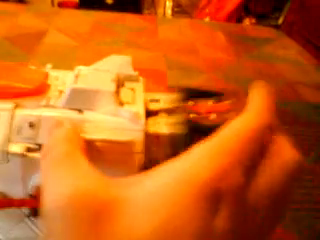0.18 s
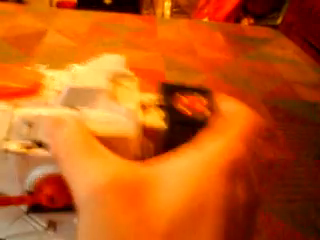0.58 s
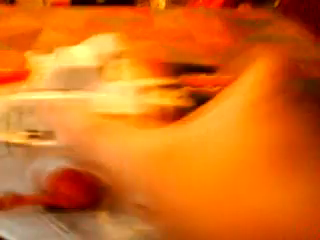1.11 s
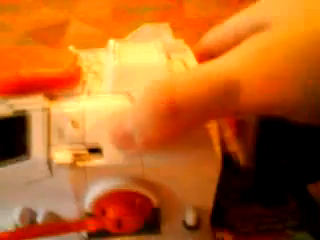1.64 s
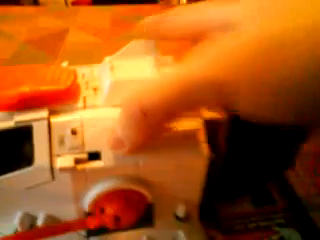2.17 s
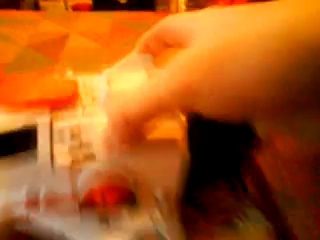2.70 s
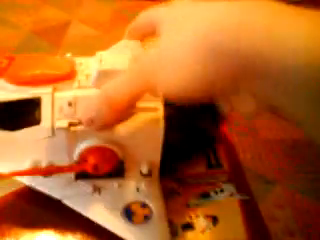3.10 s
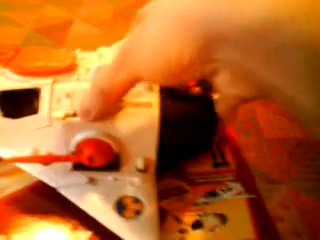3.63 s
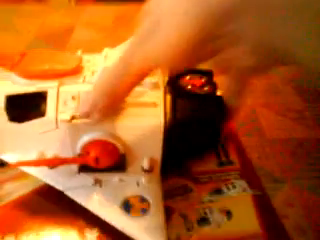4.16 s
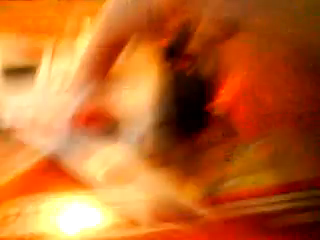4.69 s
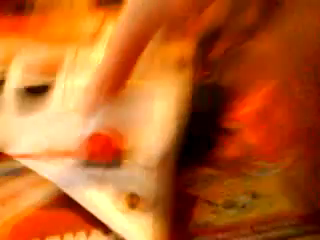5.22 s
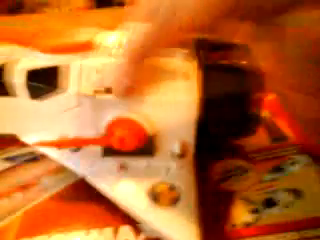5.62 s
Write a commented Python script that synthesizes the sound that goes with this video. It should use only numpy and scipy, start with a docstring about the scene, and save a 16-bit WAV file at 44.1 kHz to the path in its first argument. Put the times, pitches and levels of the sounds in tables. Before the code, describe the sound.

A hand works a hollow hard-plastic toy on a table, very close to a small microphone in a quiet room. A rapid rattle of knocks opens, then faint ticks; gritty scraping pulls follow, with a loud clatter before the middle, more scraping, and hard single knocks near the end. Low table thumps sit under the hits. Dry, mono, slightly muffled, with faint hiss and hum.

```python
"""A hand drags a hollow hard-plastic toy to and fro over a table, close to a small microphone indoors.
Over quiet hiss and hum, a short pull opens, then a burst of knocks and rattles up to 0.3 s, then faint ticks.
Longer pulls from 1.1, 2.8, 3.6 and 4.9 s send dense tiny slips into the shell; a loud clatter comes near 2.4 s,
hard knocks near 4.5 and 5.3 s, and a last pull from 5.7 s. Struck, the shell rings as a sum of dying modes;
the table top thumps underneath in modes of its own."""
import sys
import numpy as np
from scipy import signal
from scipy.fft import rfft, irfft
from scipy.io import wavfile
from scipy.ndimage import uniform_filter1d

SR = 44100
rng = np.random.default_rng(int(sys.argv[2]) if len(sys.argv) > 2 else 0)


def voltage_ratio(level):
    """Linear amplitude factor for a level in decibels (scalar or array-like)."""
    return 10 ** (np.asarray(level, float) / 20)


def file_out(sig):
    """Save sig as 16-bit WAV at sys.argv[1]."""
    # one column per channel
    cols = np.atleast_2d(sig).T
    # limit, then scale
    lim = np.clip(cols, -1, 1)
    pcm = np.round(lim * 32767).astype(np.int16)
    wavfile.write(sys.argv[1], SR, pcm)


N = 255134  # samples, about 5.8 s

# Knocks of loose parts. Each row: time of the peak in seconds (roughly), level of the shell in dB, pitch in Hz
# near which the shell rings most, level of the thin parts against the shell in dB, time to fade 60 dB in
# seconds (limited when played).
KNOCKS = [(0.0137, -12.5, 1390, -31, 0.017), (0.1106, -12.5, 1140, -23, 0.031),
          (.123, -17.5, 1440, -25, .02), (0.1374, -6, 2150, -30, 0.027), (0.1602, -9.5, 1510, 0, .019),
          (0.1722, -17, 1500, 0, .015), (.194, -13, 2000, -2, 0.017), (.2105, -11, 1700, -10, 0.022),
          (0.2191, -12, 1800, -1, .015), (0.233, -8, 1900, -10, .02), (0.243, -13, 1600, -6, 0.018),
          (.254, -10, 1900, -9, 0.022), (.2705, -15.5, 1700, -4, .015), (.167, -11, 1450, -18, 0.039),
          (0.1789, -10.5, 1340, 0.5, 0.025), (0.185, -9, 1740, -20, 0.022),
          (0.2038, -7.5, 1430, -10, 0.049), (0.2267, -9, 1450, -10, 0.025), (0.2494, -13, 1920, -31, .045),
          (0.2728, -12.5, 1680, -16.5, .029), (.286, -4.5, 1680, -9.5, 0.024), (.291, -13, 1900, -9, .015),
          (0.2967, -19, 1500, -14, .02), (0.3798, -16, 1720, -37, .045), (.406, -24.5, 2000, -4, 0.047),
          (0.4212, -24, 1990, -12, .032), (0.4527, -26.5, 1770, -4, .045), (.479, -36, 1200, -30, .012),
          (0.488, -33, 1520, -25, .045), (.526, -14.5, 1450, -21, 0.02), (.535, -28, 1300, -29, .02),
          (0.586, -26.5, 1900, -30, 0.015), (0.6148, -30.5, 1350, -13, 0.013),
          (0.67, -30.5, 1120, -30, 0.032), (0.6968, -33, 1250, -30, .024), (0.7745, -32, 1290, -19, .026),
          (.797, -26, 1030, -18, .016), (.822, -26.5, 900, -24, .015), (0.8272, -20, 2030, -9.5, 0.038),
          (.884, -28, 2200, -11, 0.016), (0.896, -5.5, 1520, -13, 0.029), (0.9, -16, 1210, -21, 0.032),
          (0.9257, -15.5, 1490, -19.5, 0.018), (0.984, -29, 1380, -18, .012), (1.017, -29, 1760, -1, 0.027),
          (1.061, -18, 1440, -9, 0.038), (1.066, -17.5, 1690, -10.5, .029),
          (1.0877, -19.5, 1570, -7.5, .027), (1.098, -26, 1480, -30, 0.021), (1.117, -17, 1450, -30, 0.04),
          (1.137, -16.5, 1500, -7, 0.031), (1.159, -5.5, 1850, -22, 0.055), (1.1712, -14, 1790, -17, .035),
          (1.182, -16, 2060, -16, .034), (1.343, -14.5, 1450, -16, 0.025), (1.3652, -12, 1500, -18.5, .02),
          (1.3732, -15.5, 1490, -12, .019), (1.3848, -14.5, 1580, -15, .012), (1.734, -13, 1800, -13, .02),
          (1.7465, -6, 1370, -10, 0.053), (1.765, -19, 1840, -27, .016), (1.7756, -17, 1780, -24, 0.018),
          (1.847, -27, 1810, -30, .037), (1.906, -20.5, 1770, -20, 0.026),
          (1.9263, -13.5, 1580, -30, 0.032), (1.951, -14.5, 1250, -29, 0.0056),
          (1.995, -18, 885, -26, 0.0081), (2.0063, -23, 1870, -1.5, 0.023), (2.043, -13, 1370, -28, 0.013),
          (2.076, -10.5, 1690, -21, 0.031), (2.1986, -13, 1400, -30.5, 0.043),
          (2.213, -5.5, 1350, -7.5, 0.017), (2.2627, -19, 1460, -24, 0.041),
          (2.319, -23, 900, -29.5, 0.022), (2.372, -14.5, 1880, -4, 0.046), (2.3803, -5, 1460, -23, 0.03),
          (2.3843, -13, 900, -11.5, .02), (2.391, -9.5, 1700, -6, .02), (2.395, -6, 1900, -5.5, 0.022),
          (2.3995, -8.5, 1650, -4.5, 0.039), (2.409, -16, 1500, -25, .017), (2.4194, -9, 2100, -20, .02),
          (2.4227, -7, 1700, -18, 0.05), (2.4278, -12, 1700, -7, .02), (2.437, -15.5, 1500, -14, .015),
          (2.449, -11.5, 1830, -12, 0.042), (2.461, -22, 1200, -7, .02), (2.4824, -21.5, 1370, -27, .016),
          (2.508, -32, 1700, -25, .012), (2.542, -27, 1450, -32, 0.044), (2.633, -30, 1780, -29, .012),
          (2.7186, -15.5, 1800, -11, 0.03), (2.748, -18.5, 1320, -9, 0.026),
          (2.7572, -15.5, 1630, -25.5, 0.039), (2.7725, -13, 1580, -7.5, .018),
          (2.866, -22.5, 1900, -18, .027), (2.914, -24.5, 600, -20, .026),
          (3.045, -17.5, 1820, -29.5, 0.052), (3.226, -15, 1680, -7, 0.029), (3.232, -17, 1640, -4, 0.0085),
          (3.24, -7, 1700, -20, 0.022), (3.26, -18, 900, -13, .014), (3.2758, -21.5, 1900, 2.5, .012),
          (3.289, -19.5, 1860, 1, 0.028), (3.516, -35, 1350, -13, .014), (3.5277, -25.5, 1610, -28, .014),
          (3.5625, -32, 1590, -28, .018), (3.624, -14, 1840, -12, 0.041), (3.6919, -10, 1680, -17, 0.015),
          (3.7018, -5, 1770, -26, 0.038), (3.7134, -19.5, 1600, -16, 0.029), (3.882, -25, 900, -25, 0.014),
          (4.481, -17.5, 1010, -22, .011), (4.488, -13.5, 1240, -16, 0.025),
          (4.5013, -2.5, 950, -7.5, 0.0091), (4.507, -14.5, 1510, -11, .015),
          (4.5134, -7.5, 1700, -9, 0.013), (4.531, -15, 1900, -23, .015), (4.5403, -15.5, 1800, -27, 0.04),
          (4.622, -35.5, 1800, 0, .015), (4.652, -32.5, 1600, 1, 0.029), (4.7015, -32, 1590, -18, 0.04),
          (4.755, -33, 2000, -5, 0.018), (4.8195, -20.5, 1620, -21, 0.026), (4.867, -17.5, 1260, -14, 0.03),
          (4.8857, -14, 1630, -24, 0.0099), (4.894, -10.5, 1520, -6.5, 0.051),
          (4.9043, -13, 1490, -22, .028), (5.1615, -15.5, 1800, -25, 0.019), (5.242, -10, 1760, -20, 0.052),
          (5.254, -21, 1200, -16, .02), (5.2653, -14, 1540, -17, .019), (5.271, -24, 1500, -19, .015),
          (5.274, -2.5, 1580, -5, 0.037), (5.292, -25, 1510, -30, .029), (5.4826, -22, 1330, -13, 0.018),
          (5.599, -31, 1820, -33, 0.026), (5.654, -15, 1990, -29, .026), (5.6727, -18.5, 1640, 0.5, 0.05),
          (5.6798, -13, 1550, -17, 0.024)]
# Ways the shell can ring; the first three are its deep body. Each row: pitch in Hz, level in dB,
# fade time as a factor.
SHELL_MODES = [(550, -16.5, 0.69), (836, -4.5, 1.1), (1010, -4, 1.3), (1258, -4.5, 1.6), (1430, -1, 0.97),
               (1660, 3.5, 0.89), (1836, 6, 0.73), (2023, 5, 0.78), (2200, 6, 0.2), (2575, -0.5, 0.12),
               (3004, 0, 0.74), (3330, -7, 0.46)]
# Ways the thin parts can ring. Each row: pitch in Hz, level in dB, fade time as a factor.
EDGE_MODES = [(3850, 3.5, 0.85), (4400, -6, 0.7), (4760, 8.5, 0.9), (5250, 3, 0.84), (5555, 12, 0.54),
              (5766, 6, 0.49), (6040, 3.5, 0.52)]
# Ways the table top can ring. Each row: pitch in Hz, level in dB, 60 dB fade time in seconds (shortened later).
TABLE_MODES = [(75, -8, 0.1), (121, -7.5, 0.089), (203.6, 2.5, 0.097), (253.2, 5.5, 0.094),
               (295.2, 10.5, 0.093), (464, 3, 0.045)]
# Tone colour of scraping on the shell. Each row: frequency in Hz, relative level in dB per Hz.
SCRAPE_COLOUR = [(700, -25.5), (1150, 2), (1900, -1.5), (2450, -4), (3000, -8.5), (3400, -25.5),
                 (4500, -30.5)]
# Tone colour of the thin parts' hiss. Each row: frequency in Hz, relative level in dB per Hz.
HISS_COLOUR = [(1880, -37), (3200, -1), (3390, -21), (4260, -0.5), (4710, -5), (5680, 3.5), (6690, -12),
               (7100, -49), (9230, -49.5), (15600, -120)]
# Tone colour of the shaken table. Each row: frequency in Hz, relative level in dB per Hz.
RUMBLE_COLOUR = [(12, -45), (20, -15), (59, -1), (92, -8), (124, -4), (179, -9.5), (206, -6), (299, -2.5),
                 (414, -14), (600, -19), (780, -34.5), (1320, -120)]
# Tone colour of the room's hiss. Each row: frequency in Hz, relative level in dB per Hz.
ROOM_COLOUR = [(12, -36.5), (20, -19), (112, 12), (206, 4), (291, -3), (411, -22.5), (688, -4), (924, 15.5),
               (1750, 11.5), (3480, -9), (5420, -14), (6600, -18), (7100, -39.5), (9230, -61.5),
               (15600, -120)]
# Narrow bands that stand out and glide while sliding. Each row: start in seconds, end in seconds (a row that
# ends before it starts is silent), first pitch in Hz, last pitch in Hz, average level in dB.
SINGING = [(1.14, 1.32, 5820, 5730, -35.5), (1.13, 1.36, 2350, 2300, -38), (1.38, 1.74, 2290, 2370, -35.5),
           (1.2, 1.61, 1410, 1110, -41), (1.44, 1.3, 4800, 4600, -38), (1.53, 1.75, 4430, 4370, -35),
           (2.792, 3.13, 1910, 2000, -39.5), (2.8, 3.16, 2470, 2520, -43), (3.76, 3.99, 1900, 1740, -33),
           (3.74, 3.98, 1490, 1520, -35.5), (3.76, 3.4, 2820, 2500, -40), (3.98, 4.2, 2540, 2680, -38.5),
           (4.08, 4.3, 2380, 2380, -32), (4.4, 4.16, 1300, 1044, -52), (3.96, 4.3, 5680, 5580, -40.5),
           (4.08, 4.32, 5250, 5420, -36), (3.97, 4.1, 3440, 4500, -42), (4.1, 4.41, 4060, 4270, -38.5),
           (4.26, 4.453, 1940, 1960, -37.5), (4.92, 5.083, 1620, 2260, -37),
           (5.027, 5.21, 1710, 1800, -33.5), (4.974, 5.13, 4860, 5130, -37), (1.48, 1.4, 2200, 2000, -33)]
# Steady pulls over the table. Each row: start in seconds, end in seconds, scrape at the start in dB,
# scrape at the end in dB, share of the thin edge in dB.
DRAGS = [(0, 0.132, -35.5, -30, -5), (0.159, 0.297, -19.5, -22, -11), (1.065, 1.1, -39, -52, -5),
         (1.144, 1.354, -32.5, -28.5, 1.5), (1.35, 1.796, -26, -26.5, -2), (1.916, 1.98, -37, -41, -0.5),
         (2.086, 2.188, -37.5, -32.5, -3.5), (2.756, 3.175, -31.5, -31.5, -2), (3.374, 3.494, -35, -57, -2),
         (3.605, 3.954, -29.5, -33, -4.5), (3.955, 4.432, -26, -28.5, -2.5), (4.798, 4.827, -45.5, -51, 0),
         (4.877, 5.207, -29.5, -29, -2), (5.667, 5.798, -30.5, -25, -5)]
# Jolts and shifts of the hand. Each row: time of the peak in seconds, scrape in dB, seconds to swell 20 dB,
# seconds to fade 20 dB (both at least 0.002 when played), share of the deep body in dB.
JOLTS = [(0.021, -37.5, -1, 0.1, 5.5), (0.221, -24.5, 0.2, 0.02, -2), (0.291, -25.5, 0.2, 0.11, -7.5),
         (.408, -30.5, -0.15, 0.12, -10), (.424, -36.5, 0.1, 0.12, -14.5), (0.45, -49, 0.5, 0.18, -11),
         (.678, -48, 0, 0, -3), (.869, -40, 0.1, 0.4, 1), (0.903, -33, 0.07, -0.16, -3),
         (.96, -45.5, 0.8, 0.5, -8), (1.165, -20, 0.09, 0.09, -13.5), (1.378, -27.5, 0, 0.25, -7.5),
         (1.746, -20, 0.16, 0.06, -15), (1.921, -35.5, 0.3, 0.43, -8), (2.085, -34.5, 0.2, 0.15, -11),
         (2.219, -18.5, 0.0962, 0.04, -19), (2.251, -30.5, 0.21, 0, 5.5), (2.357, -41, 0.4, 0, -4.5),
         (2.372, -16.5, -0.03, 0.0429, -8), (2.395, -13, -0.0266, 0.0578, -6.5),
         (2.424, -20, -0.03, 0.07, -6.5), (2.485, -28.5, 0.2, -0.04, -1.5), (2.56, -50, 2.5, 2.5, -3),
         (2.585, -41, .05, .06, -8), (2.765, -28.5, 0.08, 0.24, -11.5), (3.04, -37.5, -0.3, 0.9, -11.5),
         (3.24, -19, 0.04, 0.04, -4), (3.268, -26, 0.02, 0.06, -4), (3.383, -33.5, 0.2, 0.08, -4.5),
         (3.645, -25, 0.05, 0.36, -9), (4.44, -35.5, -0.7, 0.32, -4), (4.503, -19.5, 0, 0.0846, -9),
         (4.649, -52, 0.5, 0.3, -4), (4.809, -38, -0.13, 0.1, -3), (4.884, -30.5, 0, 0.4, -7.5),
         (5.272, -18.5, 0.03, 0.0558, -2), (5.33, -39.5, -0.4, 0.4, -14), (5.5, -51, 3, -0.5, 2.5),
         (5.638, -42.5, 0.14, -1.5, 0.5), (5.669, -26.5, 0.05, 0.2, -10)]
# The hand leans the toy onto the table, which rumbles. Each row: time of the peak in seconds, level in dB,
# seconds to swell 20 dB, seconds to fade 20 dB (both at least 0.002 when played).
LEANS = [(.05, -44.5, 0.5, 0.3), (.17, -37, 0, 0.29), (.291, -30.5, 0.15, 0.03), (.532, -51, 0, 0.2),
         (.66, -46.5, .1, 0.1), (0.868, -37.5, 0.04, 0.2), (1.06, -39.5, 0.1, 0.36),
         (1.164, -34.5, 0.04, 0), (1.378, -37, 0.07, 0.26), (1.746, -36, 0.15, 0.18), (1.921, -44.5, 0, 1),
         (2.218, -28.5, 0.04, 0.09), (2.404, -26, -0.02, 0.1), (2.765, -36, 0.06, -0.04),
         (3.041, -50, 0.3, -0.5), (3.206, -37, -0.23, 0.34), (3.282, -31, -0.04, 0), (3.383, -43, 0.3, 0),
         (3.567, -46.5, -0.5, 0.3), (3.643, -32, 0, 0.1), (4.464, -38, 0.12, 0.26), (4.81, -47.5, 0.3, 1.2),
         (4.877, -29.5, 0.01, 0.12), (5.1, -51.5, -2.5, 3.5), (5.26, -45, 0.3, 0.15), (5.669, -43, 0.14, 0)]
# Dull blows of the toy's base on the table top. Each row: start in seconds, peak in dB before the soft start,
# extra weight of the deepest modes in dB.
THUMPS = [(.166, -21, -6), (.203, -16.5, -5), (.2255, -14.5, -9), (.237, -16.5, -8), (.285, -11, -7),
          (.312, -22, -7.5), (.525, -29.5, -3), (.548, -34, -8), (.669, -36, -2), (.895, -31, 1),
          (1.016, -30.5, 1), (1.064, -30, 11), (1.171, -19.5, 10), (1.3435, -12, -1), (1.745, -16.5, 16),
          (1.764, -20, 29), (1.906, -24, 1.5), (2.075, -29.5, -3), (2.212, -13.5, 13), (2.379, -11.5, 0.5),
          (2.398, -11.5, -1), (2.421, -12, -4.5), (2.482, -21.5, -9), (2.541, -33, -2), (2.771, -26, 2),
          (2.792, -27, -5), (2.912, -17.5, 1), (3.044, -27, -7), (3.198, -22.5, -6), (3.226, -15, -4),
          (3.26, -19, 3), (3.377, -23.5, 4), (3.623, -22, 1), (3.702, -17.5, 1.5), (4.487, -21, -0.5),
          (4.5125, -21.5, 7), (4.88, -13, -6), (4.893, -25, -4), (5.265, -17, -6), (5.274, -16, -8),
          (5.291, -20, -1), (5.482, -34, 3), (5.677, -18.5, 9)]

ROOM_DB, HUM_DB, HUM_HZ = -53, -61, 120.4
GRIP_DB_PER_S, RELEASE_DB_PER_S = 999.5, 700.5  # how fast a pull starts and stops
DRAG_HZ, JOLT_HZ = 1900, 1580  # the shell sounds higher when pulled lightly, lower when gripped
DRAG_BODY_DB, DRAG_TABLE_DB = -26, -30.5  # what a pull passes to the deep body and the table
JOLT_EDGE_DB = -15.5  # what a jolt passes to the thin edge
REST_DB, REST_BODY_DB, REST_EDGE_DB, REST_TABLE_DB = -59.5, -61.5, -66, -57.5  # the hand at rest still rustles
FAINT_HZ, FAINT_WIDTH_HZ = 3340, 100  # a narrow band that is heard more faintly, by a varying amount
KNOCK_TABLE_DB = -21.5  # every knock leaks a little into the table
DEEP_HZ = 170
EDGE_HZ = 7080  # upper limit of the recorded band


def evened(x):
    """Scales to an average strength (rms) of 1."""
    return x / np.sqrt(np.mean(x ** 2) + 1e-20)


def coloured(x, points):
    """Filters a sound to a tone colour without pre-echo: minimum phase from the folded cepstrum."""
    f, db = np.transpose(points)
    hz = np.fft.rfftfreq(4096, 1 / SR)
    gain_db = np.maximum(np.interp(np.log(hz + 1), np.log(f + 1), db), -70)
    cepstrum = irfft(np.log(voltage_ratio(gain_db)))
    cepstrum[1:2048] *= 2  # fold the later half onto the earlier one
    cepstrum[2049:] = 0
    impulse = irfft(np.exp(rfft(cepstrum)))
    return evened(signal.oaconvolve(x, impulse)[:len(x)])


def room_tone():
    """Steady hiss of room and preamplifier with a faint mains hum."""
    hum = voltage_ratio(HUM_DB) * np.sin(2 * np.pi * HUM_HZ * np.arange(N) / SR)
    hiss = coloured(rng.standard_normal(N), ROOM_COLOUR)
    return voltage_ratio(ROOM_DB) * hiss + hum


def wander(seconds):
    """Slow random drift of rms 1: noise smoothed over the given time."""
    window = np.hanning(round(seconds * SR))
    return evened(signal.oaconvolve(rng.standard_normal(N), window, "same"))


def peaks(t, s, db, swell, fade):
    """Gain of events that swell and fade evenly in dB, one row each."""
    before = (s - t) / np.maximum(swell, .002)
    after = (t - s) / np.maximum(fade, .002)
    return voltage_ratio(db - 20 * np.maximum(before, after))


def hand():
    """Pulls, jolts, leaning and rest add in power to drive shell, body, edge and table (dB); held pitch (Hz)."""
    t = np.arange(0, N, 64) / SR
    start, end, from_db, to_db, edge_db = np.transpose(DRAGS)[:, :, None]
    along = np.clip((t - start) / (end - start), 0, 1)
    onset_db = GRIP_DB_PER_S * np.maximum(start - t, 0)
    release_db = RELEASE_DB_PER_S * np.maximum(t - end, 0)
    drag = voltage_ratio(from_db + (to_db - from_db) * along - onset_db - release_db)
    *shape, body_db = np.transpose(JOLTS)[:, :, None]
    jolt = peaks(t, *shape)
    lean = peaks(t, *np.transpose(LEANS)[:, :, None])
    # each row: share of the pulls in dB, gain of the other events, level at rest in dB
    parts = [(0, jolt, REST_DB),
             (DRAG_BODY_DB, jolt * voltage_ratio(body_db), REST_BODY_DB),
             (edge_db, jolt * voltage_ratio(JOLT_EDGE_DB), REST_EDGE_DB),
             (DRAG_TABLE_DB, lean, REST_TABLE_DB)]
    power = [((drag * voltage_ratio(db)) ** 2).sum(0) + (more ** 2).sum(0) + voltage_ratio(rest) ** 2 for db, more, rest in parts]
    pulled = (drag ** 2).sum(0) / power[0]
    held_hz = JOLT_HZ + (DRAG_HZ - JOLT_HZ) * pulled
    curves = (*(10 * np.log10(power)), held_hz)
    return [np.interp(np.arange(N) / SR, t, curve) for curve in curves]


def slips(per_s, spread_db, smooth):
    """Tiny stick-slip clicks of uneven size and sign, with smooth rubbing noise, all swelling in clumps."""
    clumps = voltage_ratio(1.15 * wander(0.008))
    size = voltage_ratio(spread_db * np.minimum(rng.exponential(1, N), 3)) * rng.choice([-1, 1], N)
    clicks = size * (rng.random(N) < per_s / SR)
    return clumps * (evened(clicks) + smooth * rng.standard_normal(N))


def near_db(hz, centre_hz, steep_db):
    """Modes near the pitch of the touched spot ring most; steep_db is lost one octave away."""
    return -steep_db * np.log2(hz / centre_hz) ** 2


def rubbed(x, modes, width_hz, centre_hz, steep_db, grip_db):
    """Slips drive each mode; the shifting grip damps now one mode, now another."""
    out = np.zeros(N)
    for hz, db, _ in modes:
        mode = evened(signal.lfilter(*signal.iirpeak(hz, hz / width_hz, SR), x))
        out += voltage_ratio(db + near_db(hz, centre_hz, steep_db) + grip_db * wander(0.14)) * mode
    return out / np.sqrt(uniform_filter1d(out ** 2, SR // 8) + 1e-12)  # steady over an eighth of a second


def singing(x, width_hz):
    """Gliding resonances: shift the band to zero, smooth twice, shift back."""
    out = np.zeros(N)
    r = np.exp(-np.pi * width_hz / SR)
    smoother = np.convolve([1, -r], [1, -r])
    waver, patchy = 1 + .015 * wander(0.055), voltage_ratio(2.5 * wander(0.017))  # the grip is never still
    for start, end, from_hz, to_hz, db in SINGING:
        part = slice(round(start * SR), round(end * SR))
        glide_hz = np.linspace(from_hz, to_hz, len(x[part])) * waver[part]
        turn = np.exp(2j * np.pi * np.cumsum(glide_hz) / SR)
        band = (turn * signal.lfilter([1], smoother, x[part] / turn)).real
        out[part] += voltage_ratio(db) * patchy[part] * evened(band) * signal.windows.tukey(len(band), .4)
    return out


def sliding():
    """Slips excite shell and thin edge, partly broad, partly in their modes; slower bumps shake the table."""
    scrape_db, body_db, hiss_db, rumble_db, held_hz = hand()
    # a light touch rustles in fits
    fitful_db = np.clip(0.36 * (-37.0 - scrape_db), 0, 3.5) * wander(0.025)
    rub = slips(per_s=2000, spread_db=3.0, smooth=0.83)
    fine = 0.052 * rub + slips(per_s=6500, spread_db=1.0, smooth=0.91)
    bumps = slips(per_s=420, spread_db=6.5, smooth=1.72)

    scrape = 0.32 * coloured(rub, SCRAPE_COLOUR)
    scrape += 0.55 * rubbed(rub, SHELL_MODES[3:], 220, held_hz, steep_db=22.0, grip_db=6.5)
    deep = rubbed(rub, SHELL_MODES[:3], 200, 850, steep_db=3, grip_db=3.0)
    deep = signal.sosfilt(signal.butter(2, [480, 1300], "bandpass", fs=SR, output="sos"), deep)
    hiss = .8 * coloured(fine, HISS_COLOUR)
    hiss += .45 * rubbed(fine, EDGE_MODES, 150, 5200, steep_db=0, grip_db=2.5)

    shell = voltage_ratio(scrape_db + fitful_db) * scrape
    shell += voltage_ratio(body_db + fitful_db) * deep
    shell += voltage_ratio(hiss_db + 0.83 * fitful_db) * hiss
    shell += singing(rub, width_hz=263)
    removed = np.clip(0.25 + 0.44 * wander(0.22), 0, 1)  # varying share taken out of the faint band
    faint_band = signal.lfilter(*signal.iirpeak(FAINT_HZ, FAINT_HZ / FAINT_WIDTH_HZ, SR), shell)
    shell -= removed * faint_band
    rumble = coloured(bumps, RUMBLE_COLOUR)
    return shell + voltage_ratio(rumble_db + 1.9 * wander(0.023)) * rumble


def ring(modes, t, t60, luck, weight_db=0):
    """Sum of dying modes, a little detuned, of random strength and sign, as grip and point of contact vary."""
    hz, db, long = np.transpose(modes)[:, :, None]
    strength, detune = luck[:2 * len(modes)].reshape(2, -1, 1)
    fading_db = db + weight_db + 2.5 * strength - 60 * t / (t60 * long)
    wave = np.sin(2 * np.pi * hz * (1 + 0.045 * detune) * t)
    sound = (voltage_ratio(fading_db) * np.sign(detune + 1) * wave).sum(0)
    return sound / abs(sound).max()


def knocks():
    """Each knock is one hard crack and milliseconds of grinding that ring shell and thin parts, drily."""
    out, t = np.zeros(N + SR), np.arange(6000) / SR
    luck = rng.standard_normal((len(KNOCKS), 48 + 300))  # 24 for the shell, 24 for the edge, 300 to grind
    shell_hz = np.array(SHELL_MODES)[:, :1]
    rise, grind = .0009, .0025  # s
    grinding = np.minimum(t[:300] / rise, 1) * np.exp(-t[:300] / grind)
    hollow = signal.butter(3, [560, 2900], "bandpass", fs=SR, output="sos")  # small thick shell: no bass, no fizz
    for (s, peak_db, hz, sharp_db, t60), dice in zip(KNOCKS, luck):
        t60 = np.clip(t60, .006, .027)
        shell = signal.sosfilt(hollow, ring(SHELL_MODES, t, t60, dice, near_db(shell_hz, hz, 12.5)))
        edge = ring(EDGE_MODES, t, 0.4 * t60, dice[24:])
        edge[:3] += 0.22 * np.array([-1, 2, -1])  # the bare tick of the contact
        contact = 0.25 * dice[48:] * grinding  # bites, cracks, grinds out
        contact[round(rise * SR)] += .5
        shell = np.convolve(shell, contact)[:len(t)]
        edge = np.convolve(edge, contact)[:len(t)]
        sound = shell / abs(shell).max() + voltage_ratio(sharp_db) * edge / abs(edge).max()
        out[round((s - 2 * rise) * SR):][:len(t)] += voltage_ratio(peak_db) * sound
    return out[:N]


def thumps():
    """Each blow, and faintly each knock, rings the modes of the table top after a soft start."""
    out, t = np.zeros(N + SR), np.arange(6000) / SR
    blows = THUMPS + [(s, db + KNOCK_TABLE_DB, 0) for s, db, *_ in KNOCKS]
    deep = np.array(TABLE_MODES)[:, :1] < DEEP_HZ
    soft_start = 1 - np.exp(-t / 0.0021)
    for (s, db, deep_db), dice in zip(blows, rng.standard_normal((len(blows), 12))):
        sound = ring(TABLE_MODES, t, 0.65, dice, deep * deep_db) * soft_start
        out[round(s * SR):][:len(t)] += voltage_ratio(db) * sound
    return out[:N]


def walls(x):
    """Echo of table and walls: sparse taps of random sign dying away 60 dB in 0.067 s."""
    at = np.arange(150, 12000, 20) + rng.integers(0, 20, 593)
    taps = np.zeros(12100)
    taps[at] = rng.choice([-1., 1.], len(at)) * voltage_ratio(-60 * at / SR / 0.067)
    return signal.oaconvolve(x, taps / np.linalg.norm(taps))[:N]


def scene():
    """Knocks and thumps with their echo, sliding and room tone, one channel."""
    hits = knocks() + thumps()
    echo = voltage_ratio(-10.0) * walls(hits)
    return (hits + echo + sliding() + room_tone())[None]


def low_pass(x):
    """Removes everything above the highest recorded frequency."""
    return signal.sosfilt(signal.butter(12, 7880, fs=SR, output="sos"), x)


def record(dry):
    """The small capsule loses the deepest bass, the input rounds the highest peaks; band limit near 7 kHz."""
    thin = signal.sosfilt(signal.butter(1, 60, "highpass", fs=SR, output="sos"), dry)
    rounded = .85 * np.tanh(thin / .85)
    lowpass = signal.firwin(801, EDGE_HZ, window=("kaiser", 9), fs=SR)
    narrow = signal.oaconvolve(rounded, lowpass[None], "same")
    return low_pass(narrow)


dry = scene()
out = record(dry)
file_out(out)
```